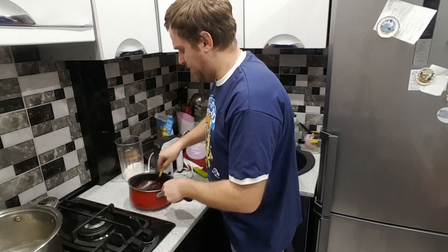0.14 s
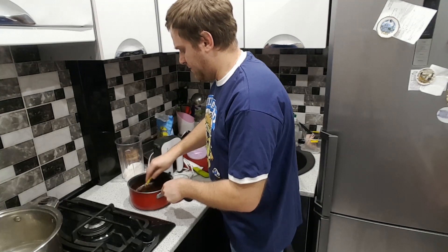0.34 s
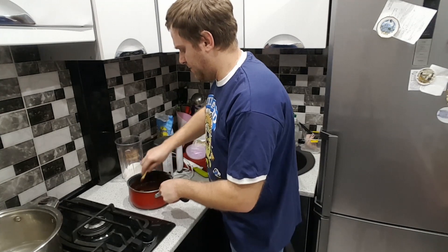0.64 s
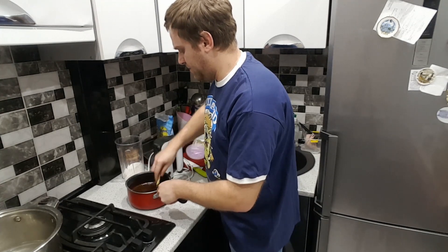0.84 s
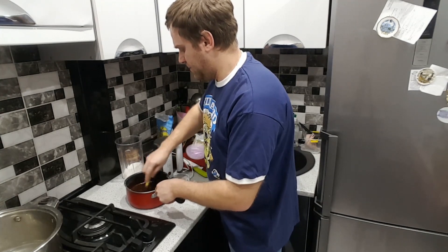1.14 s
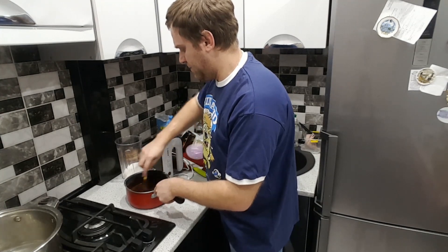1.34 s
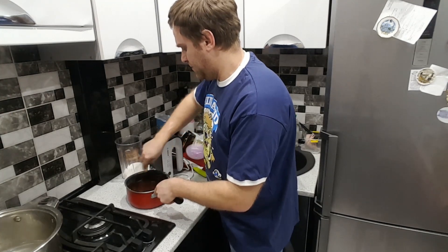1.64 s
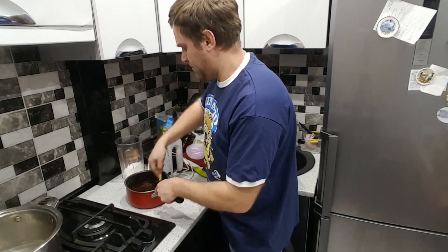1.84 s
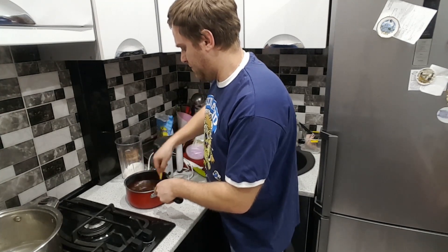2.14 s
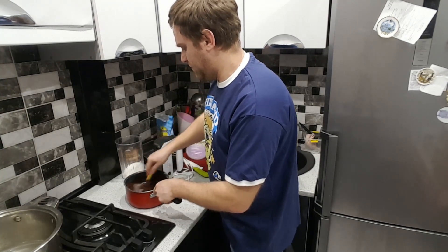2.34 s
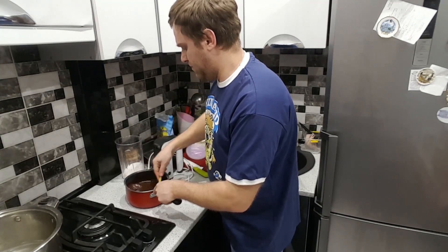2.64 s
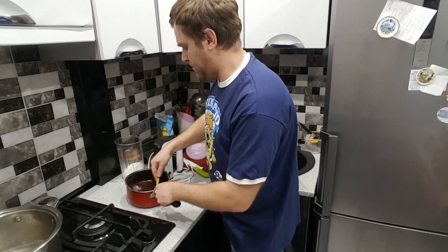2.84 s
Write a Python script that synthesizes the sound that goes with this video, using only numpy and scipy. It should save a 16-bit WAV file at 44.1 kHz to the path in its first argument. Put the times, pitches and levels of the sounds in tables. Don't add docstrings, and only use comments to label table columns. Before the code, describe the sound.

A spatula works thick batter in a metal pan, making dull knocks with wet cracks and faint short scrapes, sparse at first, then quicker and sharper, in a small tiled kitchen, heard from about one and a half metres.

```python
import sys
import numpy as np
from scipy import signal
from scipy.fft import rfft, irfft
from scipy.io import wavfile
from scipy.ndimage import uniform_filter1d

SR = 44100
rng = np.random.default_rng(int(sys.argv[2]) if len(sys.argv) > 2 else 0)


def to_wav(sig):
    pcm = np.clip(np.atleast_2d(sig), -1, 1) * 32767
    pcm = np.round(pcm).astype(np.int16)
    wavfile.write(sys.argv[1], SR, pcm.T)


def magnitude_from_level(level_db):
    exponent = np.asarray(level_db, float) / 20
    return 10 ** exponent


N = 132300

# start_s, thud_level_db, thud_pitch_hz, crack_level_db, crack_tilt_db_per_octave
IMPACTS = [(.017, -15, 444, -45, 14), (.086, -21.5, 545, -22, -3.5), (.184, -32.5, 645, -27, -7),
           (.349, -27.5, 640, -26.5, 6.5), (.640, -36.5, 646, -34.5, -1.5), (.788, -20.5, 392, -26.5, 4.5),
           (1.023, -40.5, 634, -38, -0.5), (1.031, -40, 182, -68, 0), (1.217, -22, 490, -29, -4.5),
           (1.426, -47.5, 720, -49.5, -0.5), (1.542, -26, 476, -30, 2), (1.711, -45, 900, -43, 11),
           (1.733, -23.5, 460, -34.5, 7), (2.003, -33, 500, -32.5, -6), (2.155, -23.5, 605, -18, 1.5),
           (2.2, -30.5, 500, -78, 11), (2.303, -22, 602, -25.5, -2), (2.454, -24.5, 546, -21.5, 3),
           (2.687, -22.5, 900, -17.5, 1.5), (2.759, -19, 593, -11.5, 3.5), (2.897, -27.5, 850, -20.5, -1.5),
           (2.957, -17.5, 700, -12.5, 2.5)]
# start_s, length_s, rub_level_db, hiss_level_db, rub_pitch_hz
DRAGS = [(-.06, 0.077, -28.5, -55, 480), (.02, 0.021, -37, -69, 472), (0.186, 0.24, -45.5, -71.5, 263),
         (.352, 0.089, -40.5, -56.5, 314), (0.42, 0.16, -42, -53, 480), (0.799, .15, -38.5, -53.5, 410),
         (1.054, 0.12, -52.5, -80, 219), (1.235, 0.084, -40.5, -58.5, 443), (1.588, .13, -46.5, -59, 620),
         (1.738, 0.19, -41.5, -45, 760), (2.014, 0.042, -34, -53.5, 537), (2.191, 0.068, -39, -48, 930),
         (2.319, 0.091, -44.5, -70, 520), (2.472, 0.046, -40, -61, 553), (2.682, 0.024, -77, -57, 816),
         (2.776, 0.031, -35, -66, 810), (2.874, 0.049, -66, -77, 900)]
# start_s,
# pitch_hz, level_db, t60_s
WALL_NOTES = [(.017, 789, -26.5, 0.15), (0.019, 237, -26.5, 0.035), (.024, 317, -23.5, 0.14),
              (0.032, 71, -27, 0.19), (.086, 692, -23, 0.053), (0.088, 215, -28, 0.055),
              (.092, 324, -22.5, 0.036), (.184, 430, -37.5, 0.031), (0.182, 3940, -39, 0.025),
              (.184, 2850, -33.5, 0.0091), (.359, 343, -27.5, 0.045), (0.418, 370, -39, 0.046),
              (.5, 537, -30.5, 0.022), (.655, 436, -54, 0.046), (0.789, 327, -30, 0.022),
              (2.689, 1066, -35.5, .04), (.877, 495, -27.5, 0.024), (1.114, 213, -51, 0.048),
              (1.166, 444, -54.5, 0.035), (1.217, 254, -25, 0.045), (1.217, 1044, -30, 0.018),
              (1.231, 464, -27.5, 0.064), (1.55, 454, -30.5, 0.043), (1.544, 3700, -39, 0.019),
              (1.646, 475, -42, 0.073), (1.734, 259, -34, 0.13), (1.733, 838, -39, 0.11),
              (1.735, 1970, -39.5, 0.022), (2.003, 679, -31.5, 0.11), (2.004, 1580, -38, 0.054),
              (2.091, 458, -46, 0.013), (2.156, 269, -37, 0.046), (2.156, 856, -22.5, 0.027),
              (2.159, 492, -31.5, 0.097), (2.302, 602, -24, 0.048), (2.304, 215, -31.5, 0.043),
              (2.304, 1495, -30, 0.017), (2.461, 473, -28.5, 0.048), (2.454, 1100, -34, 0.041),
              (2.695, 259, -40, 0.066), (2.69, 452, -33, 0.027), (2.688, 900, -31, 0.043),
              (2.759, 583, -22.5, 0.031), (2.761, 1490, -30, .04), (2.774, 62, -33, 0.34),
              (2.897, 938, -31, 0.082), (2.901, 427, -41, 0.03), (2.957, 636, -18, 0.072),
              (2.958, 1420, -24, 0.035), (2.957, 3230, -25, 0.019)]
# frequency_hz, density_db_per_hz
CRACK_SPECTRUM = [(500, -5.5), (1500, 6), (3200, 2.5), (5500, -10.5), (7000, -11), (9500, -26.5),
                  (15000, -38)]
# frequency_hz, density_db_per_hz
HISS_SPECTRUM = [(600, -0.5), (1500, -7.5), (3400, 1), (5500, -5), (7000, -2.5), (9500, -16), (14000, -21)]
# frequency_hz, level_db, t60_s
ROOM_MODES = [(142.1, -9, 0.75), (161.3, -10, 0.82), (215, -4.5, 0.21), (260.8, -1.5, 0.14),
              (331.5, -7, 0.22), (393.8, -21.5, 0.6), (445.8, -1.5, 0.15), (478.4, -8, 0.81),
              (509, -2.5, 0.16), (579, -10.5, 0.4), (605.5, -9, 0.062), (720, -4, 0.099),
              (859.3, -10, 0.08), (928, -7, 0.071)]
# frequency_hz, t60_s
TAIL_DECAY = [(150, 1), (400, 0.33), (1000, 0.25), (3000, 0.3), (8000, 0.24), (15000, 0.48)]
# frequency_hz, density_db_per_hz
AIR_SPECTRUM = [(30, -8), (70, 2), (250, -7.5), (500, -2.5), (1150, -22.5), (2000, -21), (8350, -30.5),
                (15500, -30.5)]


def colour(x, points):
    curve_hz, curve_db = np.array(points, float).T
    hz = np.maximum(np.fft.rfftfreq(2048, 1 / SR), 10)
    log_gain = np.interp(np.log(hz), np.log(curve_hz), curve_db) * np.log(10) / 20
    cepstrum = irfft(log_gain)
    cepstrum[1:1024] *= 2
    cepstrum[1025:] = 0
    impulse = irfft(np.exp(rfft(cepstrum)))
    return signal.fftconvolve(x, impulse)[:len(x)]


def band(x, hz, width, order=2):
    r = 1 + max(width, .1) / 2
    edges_hz = [hz / r, min(hz * r, .45 * SR)]
    return signal.sosfilt(signal.butter(order, edges_hz, "bandpass", fs=SR, output="sos"), x)


def unit(x):
    return x / np.sqrt(np.mean(x ** 2))


def add(out, x, start_s):
    i = int(round(start_s * SR))
    a, b = max(i, 0), min(i + x.shape[-1], N)
    out[..., a:b] += x[..., a - i:b - i]


def decay(t, t60_s):
    return np.exp(-np.log(1000) * t / t60_s)


def slips(size, per_s):
    spread_db = 2.2
    chance, sign, strength = rng.random((3, size))
    return (chance < per_s / SR) * np.sign(sign - .5) * magnitude_from_level(-spread_db * np.log(1 - strength))


def kitchen_air():
    air_db, hum_hz, hum_db, fan_hz, fan_db = -61.5, 98.6, -67, 1640, -70
    mid, side = (colour(rng.standard_normal(N + SR), AIR_SPECTRUM)[SR:] for _ in range(2))
    side = signal.lfilter(*signal.butter(1, 150, "high", fs=SR), side)
    air = (mid + side * np.array([[1], [-1]])) * magnitude_from_level(air_db) / np.std(mid)
    fan = magnitude_from_level(fan_db) * unit(band(rng.standard_normal((2, N)), fan_hz, 0.21))
    hum = magnitude_from_level(hum_db) * np.sqrt(2) * np.sin(2 * np.pi * hum_hz * np.arange(N) / SR)
    return air + hum + fan


def swell(length_s, peak_share):
    u = np.linspace(0, 1, int(length_s * SR))
    return np.sin(np.pi / 2 * np.minimum(u / peak_share, (1 - u) / (1 - peak_share)))


def stroke(length_s, rub_db, hiss_db, rub_hz):
    rub_slips_per_s, hiss_slips_per_s = 1500, 5000
    patch_db, patch_s = 2.2, .004
    grip, speed = swell(length_s, 0.33), swell(length_s, .55)
    size = SR // 4
    roughness = uniform_filter1d(rng.standard_normal(size), int(patch_s * SR))
    patches = magnitude_from_level(patch_db * unit(roughness))
    rub = unit(band(slips(size, rub_slips_per_s), rub_hz, 2.46))[:len(grip)]
    hiss = unit(patches * colour(slips(size, hiss_slips_per_s), HISS_SPECTRUM))[:len(grip)]
    return grip * magnitude_from_level(rub_db - 6.5) * rub + speed ** 1.4 * magnitude_from_level(hiss_db - 3) * hiss


def knock(thud_db, thud_hz, crack_db, tilt_db):
    settle_s, settle_db, crack_s, spray_db = 0.012, -12.5, 0.0017, -32
    t = np.arange(SR // 16) / SR
    push = magnitude_from_level(settle_db) * slips(len(t), 400) * np.exp(-t / settle_s)
    snap = magnitude_from_level(spray_db) * rng.standard_normal(len(t)) * np.exp(-t / crack_s)
    push[0] = snap[0] = 1
    thud = band(push, thud_hz, 1.58, order=3)
    thud = thud / abs(thud).max()
    tilted = [(hz, db + tilt_db * np.log2(hz / 3000)) for hz, db in CRACK_SPECTRUM]
    crack = colour(snap, tilted)
    return magnitude_from_level(thud_db + 0.5) * thud + magnitude_from_level(crack_db + 13) * crack


def note(hz, db, t60_s):
    t = np.arange(SR // 8) / SR
    return magnitude_from_level(db) * np.sin(2 * np.pi * hz * t) * decay(t, min(t60_s, .09))


def diffuse_bands():
    alike_hz = 900
    bands = []
    for hz in 125 * 2. ** np.arange(0, 7.1, .5):
        mid, side = band(rng.standard_normal((2, SR)), hz, 0.42)
        side = min(hz / alike_hz, 1) * side
        bands.append((hz, mid + side * np.array([[1], [-1]])))
    return bands


def tail(bands):
    tail_db, early_db, early_t60_s, early_bright = 3, 2, 0.13, 0.17
    first_echo_s, build_s = .0007, .001
    t = np.arange(SR // 2) / SR
    start = rng.integers(SR // 2)
    decay_hz, decay_t60_s = np.array(TAIL_DECAY).T

    def fade(t60_s):
        return decay(t, t60_s) / np.sqrt(t60_s * SR / 7)

    out = 0
    for hz, pair in bands:
        late = fade(np.interp(np.log(hz), np.log(decay_hz), decay_t60_s))
        early = fade(early_t60_s * (500 / hz) ** early_bright)
        shape = magnitude_from_level(tail_db) * late + magnitude_from_level(early_db) * early
        piece = pair[:, start:start + len(t)] * shape
        energy = np.mean(pair ** 2) * np.sum(shape ** 2)
        out = out + piece * np.sqrt(energy / np.sum(piece ** 2, 1, keepdims=True))
    out = out * np.clip((t - first_echo_s) / build_s, 0, 1)
    out[:, 0] += 1
    return out


def modes(chance):
    mode_db, scatter_db, side_share, build_s, t60_max_s = -2, 1.2, 0.05, .006, .27
    t = np.arange(SR // 2) / SR
    hz, db, t60_s = np.array(ROOM_MODES).T[:, :, None]
    level_chance, side_chance, phase = chance[:, :, None]
    t60_s = np.minimum(t60_s, t60_max_s * np.maximum(220 / hz, 1))
    envelope = magnitude_from_level(db + scatter_db * level_chance) * decay(t, t60_s) * np.minimum(t / build_s, 1)
    side = side_share * hz / 500 * side_chance
    ears = [envelope * np.sin(2 * np.pi * hz * t + phase + sign * side) for sign in (1, -1)]
    ring = np.array([ear.sum(0) for ear in ears])
    return ring * magnitude_from_level(mode_db) * 2 * 500 / SR


def scene():
    note_room_db, low_cut_hz = -3, 152
    out, bands = np.zeros((2, N)), diffuse_bands()
    sounds = [(s, knock(*row)) for s, *row in IMPACTS]
    sounds += [(s, stroke(*row)) for s, *row in DRAGS]
    rooms = [tail(bands) + modes(rng.standard_normal((3, len(ROOM_MODES)))) for _ in sounds]
    direct = np.arange(SR // 2) == 0
    for s, *row in WALL_NOTES:
        nearest = np.argmin([abs(s - impact[0]) for impact in IMPACTS])
        rooms.append(direct + magnitude_from_level(note_room_db) * rooms[nearest])
        sounds.append((s, note(*row)))
    for (s, x), answer in zip(sounds, rooms):
        add(out, signal.fftconvolve(x[None], answer, axes=1), s)
    low_cut = signal.butter(3, low_cut_hz, "high", fs=SR, output="sos")
    return signal.sosfilt(low_cut, out) + kitchen_air()


def roll_off(x):
    return signal.sosfilt(signal.butter(12, 16020, fs=SR, output="sos"), x)


def record(dry):
    mix = np.array([np.roll(dry[0], 4), dry[1]])
    mix = signal.sosfilt(signal.ellip(8, .3, 60, 15600, fs=SR, output="sos"), mix)
    return roll_off(mix)


dry = scene()
out = record(dry)
to_wav(out)
```